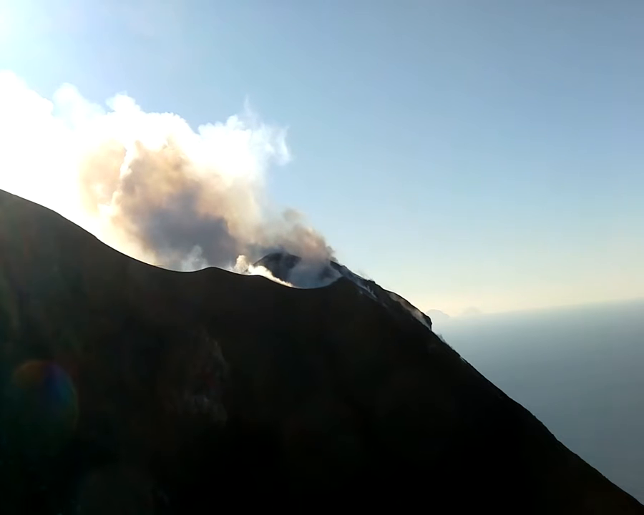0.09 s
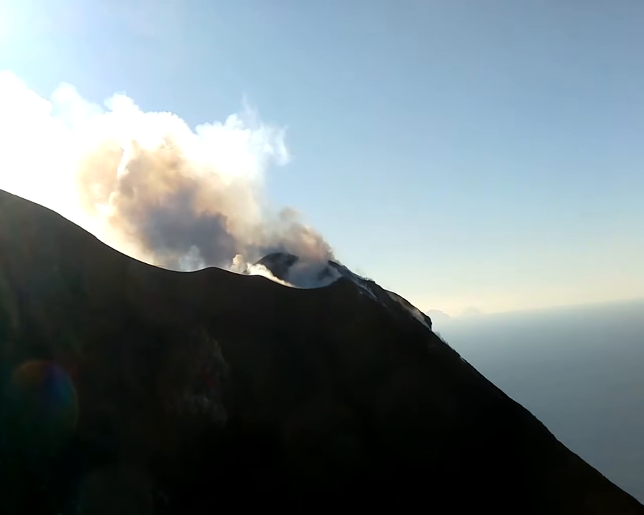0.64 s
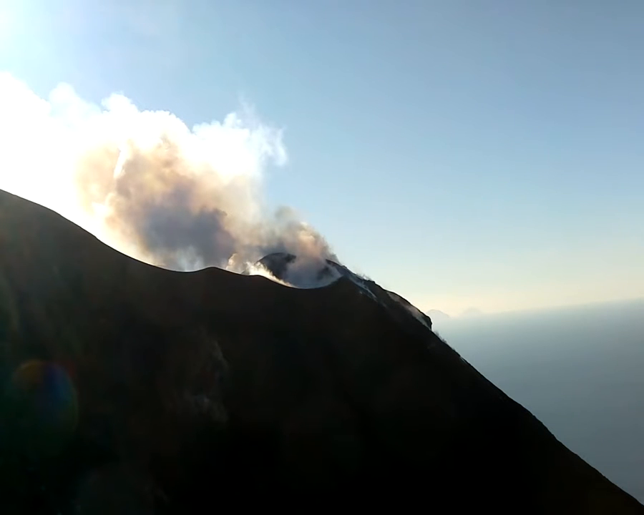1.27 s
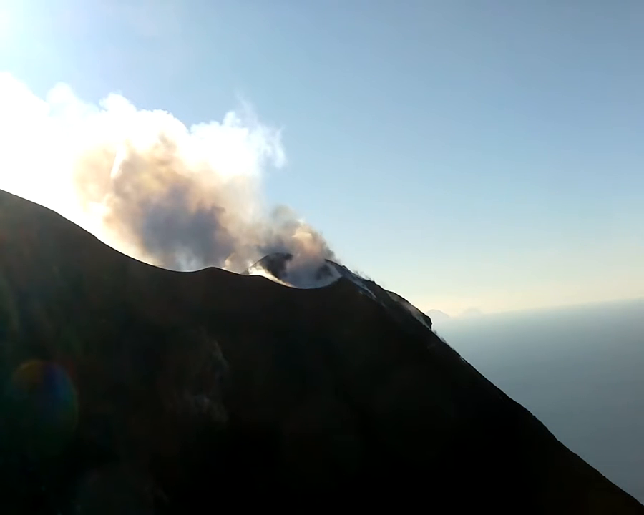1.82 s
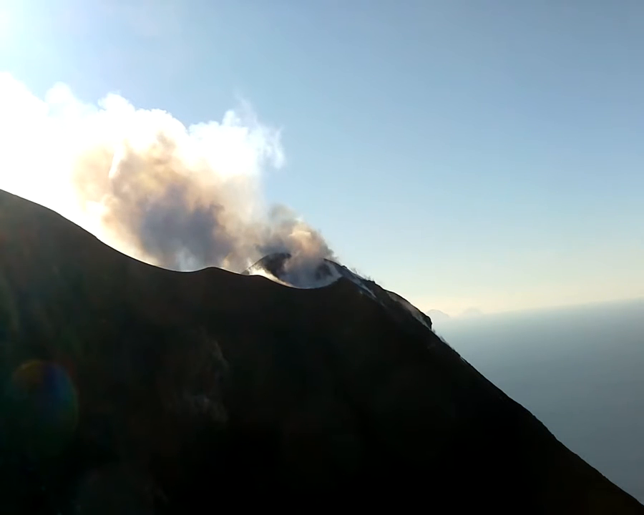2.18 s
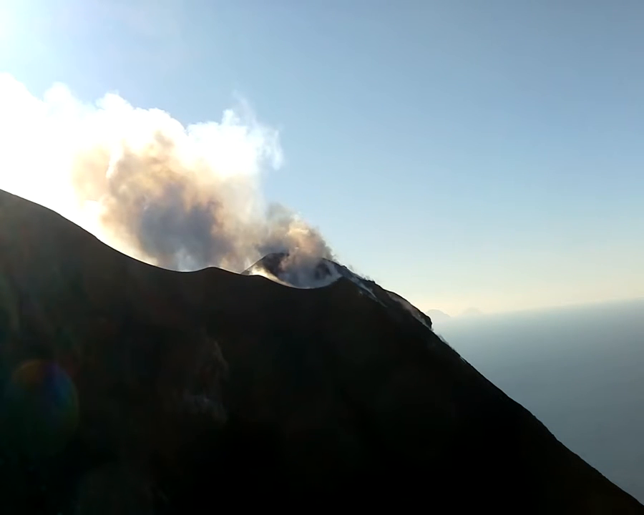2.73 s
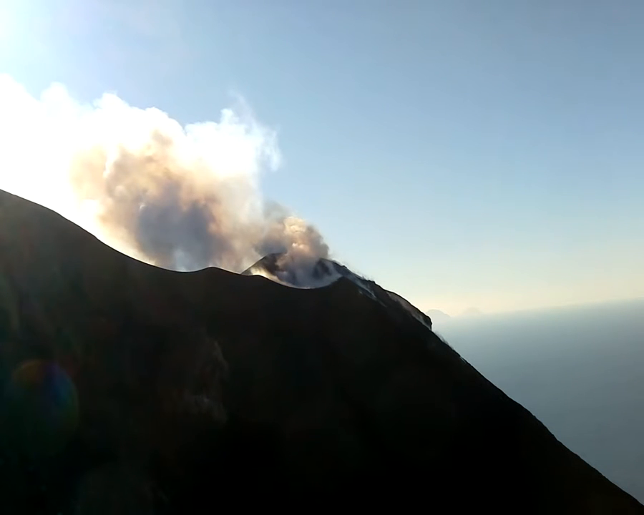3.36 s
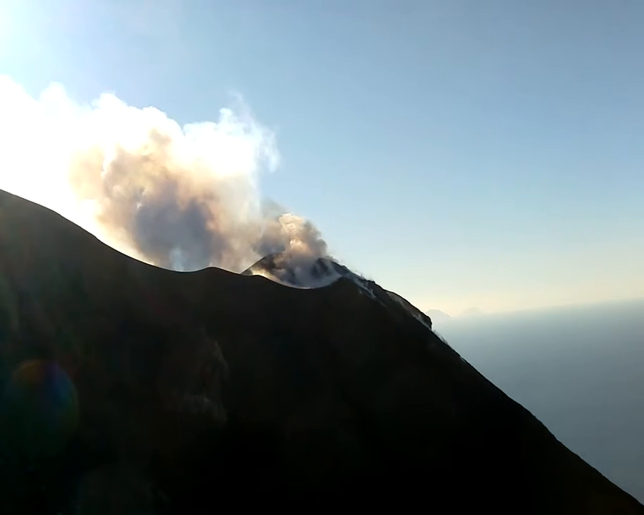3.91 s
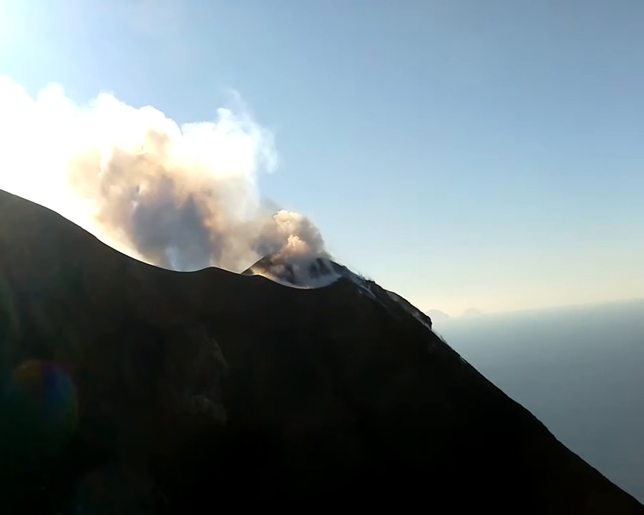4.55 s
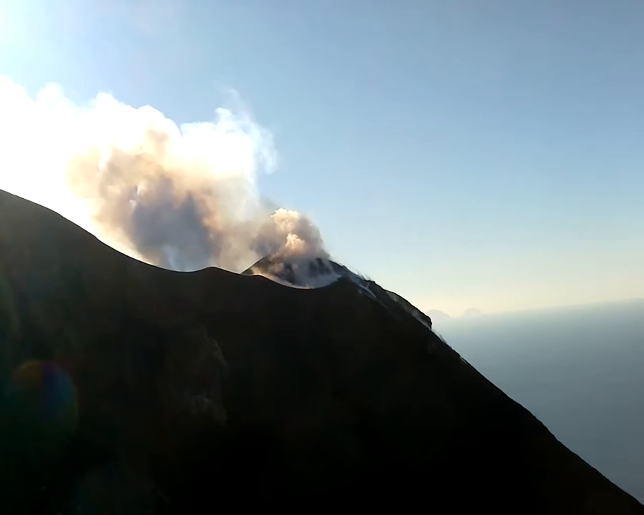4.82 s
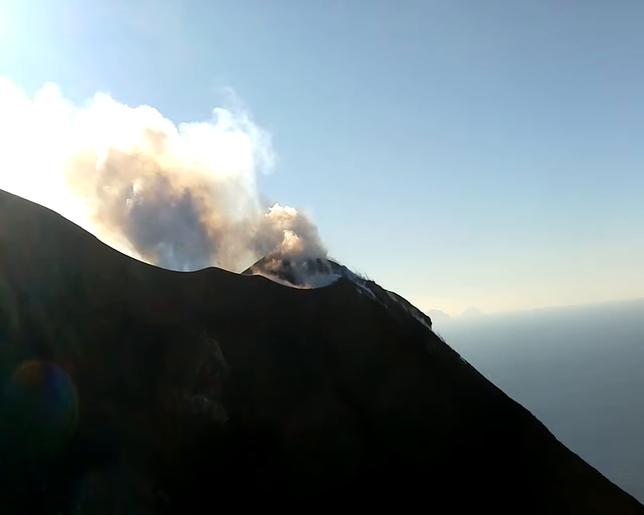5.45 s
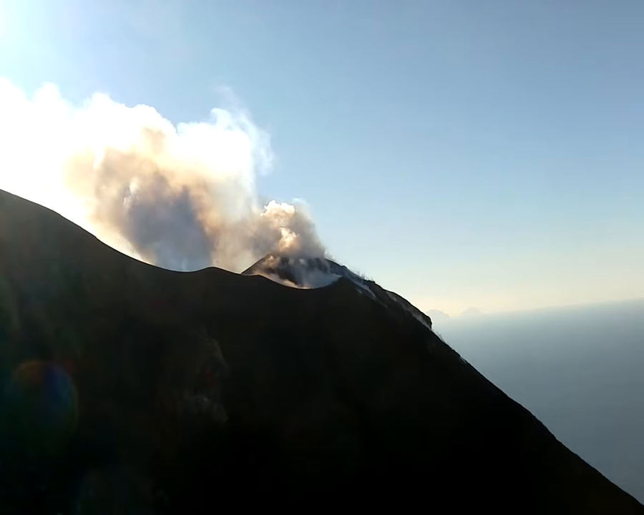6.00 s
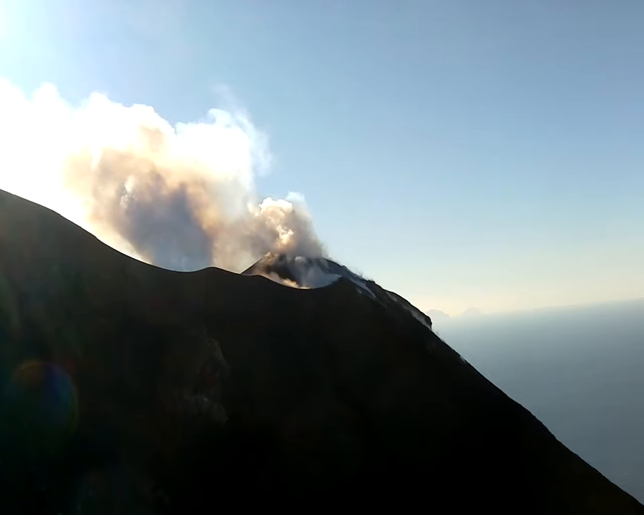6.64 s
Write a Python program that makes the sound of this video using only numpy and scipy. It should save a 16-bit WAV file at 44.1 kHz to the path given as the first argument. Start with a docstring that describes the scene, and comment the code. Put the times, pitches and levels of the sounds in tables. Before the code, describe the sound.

Light wind rumbles and flutters on the microphone in uneven gusts, with a dull far-off roar and slight hiss behind.

```python
"""Low, soft gusts of light wind buffet a camera's microphone, high on a smoking volcano.
Big swirls of air rumble, small ones flutter, and now and then a single swirl lands as a soft thump.
Slow surges of air pressure rock the microphone, the strongest one into overload.
Behind them lie a steady distant rumble and the camera's own faint hiss and whine."""
import sys
import numpy as np
from scipy import signal
from scipy.fft import rfft, irfft, next_fast_len
from scipy.io import wavfile
from scipy.ndimage import map_coordinates

SR = 44100
rng = np.random.default_rng(int(sys.argv[2]) if len(sys.argv) > 2 else 0)


def transcribe(signal):
    """Save signal, clipped to [-1, 1], as a 16-bit WAV file at the path in sys.argv[1]."""
    frames = np.atleast_2d(signal).T
    limited = np.clip(frames, -1, 1)
    pcm = np.round(limited * 32767).astype(np.int16)
    wavfile.write(sys.argv[1], SR, pcm)


N = 293706

# gusts at the microphone: (peak time [s], rumble level [dB], flutter level [dB], length [s])
WIND_GUSTS = [(-0.014, -18.5, -60, 0.11), (0.224, -20, -36, .13), (0.458, -25.5, -45, 0.09),
              (0.567, -25.5, -45, 0.14), (0.83, -32.5, -47.5, 0.27), (1.047, -26.5, -42, 0.14),
              (1.292, -35, -56, 0.14), (1.521, -36, -49, 0.069), (2.376, -34, -49, 0.15),
              (2.648, -40, -58, 0.27), (3.312, -42, -47.5, 0.16), (4.24, -40.5, -64, 0.36),
              (5.098, -33.5, -41.5, .09), (5.346, -26.5, -41.5, 0.16), (5.47, -28, -46, 0.082),
              (5.713, -38, -63, 0.23), (5.911, -26, -46, 0.13), (6.42, -43.5, -65, 0.18)]
# the light breeze between gusts: (time [s], level [dB])
BREEZE_LEVELS = [(0, -45.5), (2.1, -44.5), (3.0, -48), (4.8, -49.5), (5.6, -42.5), (6.66, -43.5)]
# slow surges of air pressure: (time [s], level [dB], swing rate [Hz], half length [s])
PRESSURE_SURGES = [(0.234, -10, 4.6, 0.088), (0.542, -13, 5.37, 0.159), (0.944, -11.5, 5.76, 0.14),
                   (2.308, -2.6, 6.7, 0.15), (3.687, -5.5, 6.4, 0.083), (4.567, -7, 5.76, 0.12),
                   (6.636, -6, 6.4, 0.092)]
# single swirls that hit the microphone: (time [s], peak level [dB], half length [s])
SWIRL_THUMPS = [(0.216, -20, 0.0051), (0.23, -18, 0.011), (2.351, -10, 0.015), (3.342, -21, 0.018),
                (5.086, -23, 0.011), (5.353, -29, 0.008), (5.928, -25, 0.009)]
# the tone colour of each noise: (frequency [Hz], relative level [dB])
BIG_SWIRL_SPECTRUM = [(10, -35.5), (18, 11), (25, 0), (40, -2), (58, -11.5), (80, -22), (140, -54.5),
                      (400, -120)]
SMALL_SWIRL_SPECTRUM = [(35, -44), (60, -1), (100, -3.5), (150, -13), (250, -29), (500, -51.5),
                        (1200, -120)]
SWAY_SPECTRUM = [(2, 3.0), (5, -6.0), (9, -5.5), (15, -10.5), (25, -43), (60, -120)]
FAR_RUMBLE_SPECTRUM = [(20, -8.5), (50, 2), (100, 2), (150, -2.5), (200, -8), (350, -13), (500, -17.5),
                       (1000, -24.5), (2000, -31), (5000, -42), (15000, -55)]
HISS_SPECTRUM = [(20, 6.5), (1000, 2), (3000, 1), (6000, -0.5), (12000, -2), (15700, -3.5)]
# the tones of the camera's whine: (frequency [Hz], relative level [dB])
WHINE_TONES = [(1000, -83.5), (2000, -85.5), (3000, -86), (4000, -86), (5000, -86.5), (6000, -88.5),
               (7000, -88.5), (8000, -88.5), (9000, -95), (10000, -95), (11000, -101), (12000, -107)]

RISE_SHARE, GUST_SHAPE = 0.23, 1.76  # share of a gust spent building; shape 1 = pointed, 2 = rounded
BREEZE_WANDER_DB, BREEZE_FLUTTER_DB = 2.5, -11  # random swells; flutter level next to the rumble
FLUTTER_ONSET_DB = -54  # below this strength the flutter fades twice as fast
OVERLOAD_LIMIT, TOP_HZ = 0.7, 15760


def wind_buffeting():
    """Big swirls of air rumble on the microphone; small ones add a flutter that fades fast in lulls."""
    rumble = swirling_air(BIG_SWIRL_SPECTRUM, span=0.041)
    flutter = swirling_air(SMALL_SWIRL_SPECTRUM, span=0.068)
    breeze_db = np.interp(clock(), *np.transpose(BREEZE_LEVELS))
    rumble_gain = amp(breeze_db + BREEZE_WANDER_DB * wobble(7))
    flutter_gain = amp(BREEZE_FLUTTER_DB) * rumble_gain
    for time, rumble_db, flutter_db, length in WIND_GUSTS:
        swell = gust(time, length)
        rumble_gain = np.hypot(rumble_gain, amp(rumble_db) * swell)  # their powers add up
        flutter_gain = np.hypot(flutter_gain, amp(flutter_db) * swell)
    lull_fade = flutter_gain / (flutter_gain + amp(FLUTTER_ONSET_DB))
    return rumble_gain * rumble + flutter_gain * lull_fade * flutter


def gust(peak_time, length):
    """The strength of one gust: it builds quickly and dies away more slowly."""
    t = clock() - peak_time
    side_length = length * np.where(t < 0, RISE_SHARE, 1 - RISE_SHARE)
    return np.exp(-np.abs(t / side_length) ** GUST_SHAPE)


def swirling_air(spectrum, span):
    """The noise of churning air, kept even in strength over stretches longer than span seconds."""
    air = noise(spectrum)
    width = int(span * SR)
    window = signal.windows.hann(width)
    padded_power = np.pad(air ** 2, width, "reflect")
    local_power = signal.fftconvolve(padded_power, window / window.sum(), "same")[width:-width]
    return air / np.sqrt(np.abs(local_power))


def pressure_surges():
    """The air pressure sways too slowly to hear; each surge rocks the microphone to and fro."""
    sway = amp(-26.5) * swirling_air(SWAY_SPECTRUM, span=0.78)
    for time, db, swing_hz, half_length in PRESSURE_SURGES:
        t = clock() - time
        swell = np.exp(-(t / half_length) ** 2)
        sway += amp(db) * swell * np.sin(2 * np.pi * swing_hz * t)
    return sway


def swirl_thumps():
    """The middle of a passing swirl is a short dip in pressure, with a slight rise on either side."""
    thumps = np.zeros(N)
    for time, db, half_length in SWIRL_THUMPS:
        offset = (clock() - time) / half_length
        thumps += amp(db) * (2 * offset ** 2 - 1) * np.exp(-offset ** 2)
    return thumps


def far_rumble():
    """Crater, sea and wind on the slopes merge into one dull, nearly steady roar."""
    level_db = -55.0 + 0.19 * wobble(1.75) + 0.48 * wobble(9)
    return amp(level_db) * noise(FAR_RUMBLE_SPECTRUM)


def camera_electronics():
    """The camera's amplifier hisses, and its circuits add a thin whine of steady tones."""
    phases = rng.uniform(0, 2 * np.pi, len(WHINE_TONES))
    whine = np.zeros(N)
    for (hz, db), phase in zip(WHINE_TONES, phases):
        whine += amp(db) * np.sqrt(2) * np.sin(2 * np.pi * hz * clock() + phase)
    return amp(-67.5) * noise(HISS_SPECTRUM) + amp(-1.0) * whine


def noise(spectrum):
    """Noise with an average power of 1 and the tone colour of the given spectrum."""
    size = next_fast_len(N + 8192)
    hz, db = np.transpose(spectrum)
    frequencies = np.fft.rfftfreq(size, 1 / SR)
    gain = amp(np.interp(np.log(frequencies + 1), np.log(hz + 1), db, left=-120))
    coloured = irfft(rfft(rng.standard_normal(size)) * gain, size)[:N]
    return coloured / np.sqrt(np.mean(coloured ** 2) + 1e-20)


def wobble(rate):
    """A smooth curve through random values, rate of them each second."""
    return map_coordinates(rng.standard_normal(400), [clock() * rate], mode="wrap")


def amp(db):
    """Turn decibels into a factor to multiply by."""
    return 10 ** (np.asarray(db) / 20)


def clock():
    """The time of each sample in seconds."""
    return np.arange(N) / SR


def scene():
    """Wind, distant rumble and camera noise in one channel."""
    wind = wind_buffeting() + pressure_surges() + swirl_thumps()
    return (wind + far_rumble() + camera_electronics())[None]


def record(dry):
    """Overload flattens the biggest swings, which blanks the hiss; sound above TOP_HZ is cut away."""
    flattened = np.clip(dry, -OVERLOAD_LIMIT, OVERLOAD_LIMIT)
    lowpass = signal.firwin(801, TOP_HZ, fs=SR, window="blackman")
    edge = len(lowpass) // 2
    padded = np.pad(flattened, ((0, 0), (edge, edge)), "reflect", reflect_type="odd")
    return signal.fftconvolve(padded, lowpass[None], "valid", axes=1)


dry = scene()
out = record(dry)
transcribe(out)
```